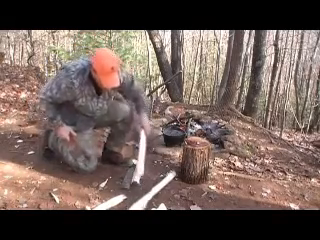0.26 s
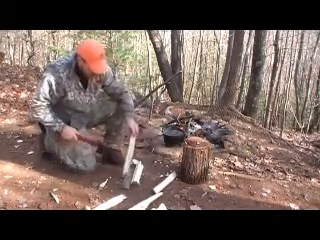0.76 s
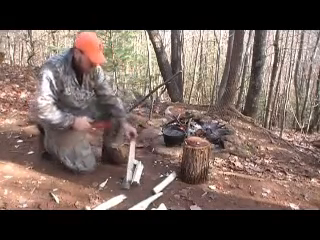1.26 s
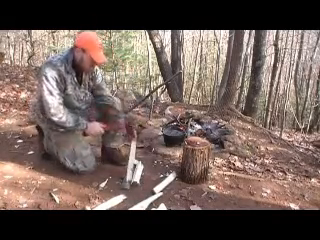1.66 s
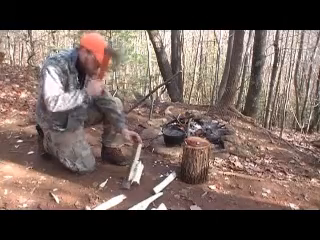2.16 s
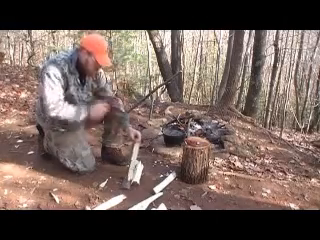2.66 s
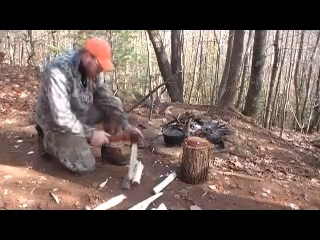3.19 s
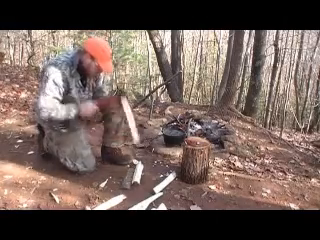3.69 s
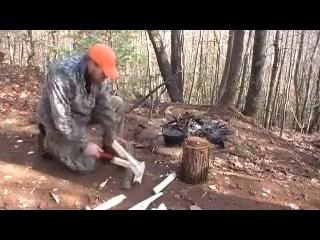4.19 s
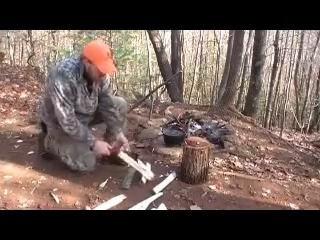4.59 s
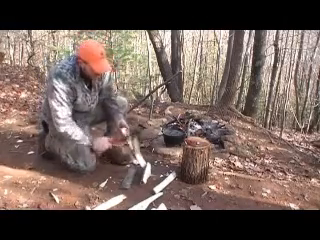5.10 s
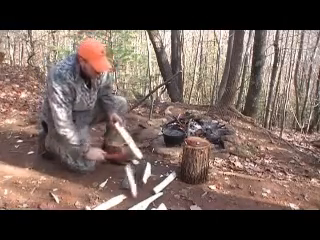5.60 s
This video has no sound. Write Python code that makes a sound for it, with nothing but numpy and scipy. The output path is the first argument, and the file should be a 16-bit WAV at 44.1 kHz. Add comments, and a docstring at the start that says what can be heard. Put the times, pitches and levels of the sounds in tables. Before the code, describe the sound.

In a quiet wood, sticks scrape and knock before three sharp axe blows crack dry wood, the middle one thudding deeper, with splinters ticking afterwards.

```python
"""A camp in a still, leafless wood, where kindling is split with a small axe a little left of the microphones.
A stick is picked off the dirt, stood on a log and tapped; three hard blows tear it open and a piece drops.
Struck wood is a sum of decaying modes; breaking fibres are bursts of tiny uneven snaps.
Wood and sleeves scrape in grains between the blows, and grit keeps the dragged stick ringing.
Dry leaves hiss faintly as filtered noise, and the trees return the work as scattered echoes."""
import sys
import numpy as np
from scipy import signal
from scipy.fft import rfft, irfft
from scipy.io import wavfile
from scipy.ndimage import uniform_filter1d

SR = 44100
rng = np.random.default_rng(int(sys.argv[2]) if len(sys.argv) > 2 else 0)


def unload_wav(signal):
    """Save mono or channel-first audio to the path in sys.argv[1] as 16-bit WAV at rate SR, clipped to [-1, 1]."""
    wavfile.write(
        sys.argv[1],
        SR,
        np.round(np.clip(np.atleast_2d(signal).T, -1, 1) * 32767).astype(np.int16),
    )


N = 257984  # samples in the scene

# Modes of each struck thing, by name. Each row: frequency in Hz, relative level in dB, t60 in seconds,
# all as they are before the pitch, tilt and ring factors of a contact.
WOOD_MODES = { "stick": [(437, -13, 0.0076), (680, -11.5, 0.11), (828, -14.5, 0.082), (930, -17, 0.067),
              (1020, -11, 0.053), (1197, -10.5, 0.089), (1536, -13.5, 0.03), (1665, -1.5, 0.079),
              (2145, -12.5, 0.053), (2555, -17, 0.062), (2806, -10, 0.044), (3220, -28, 0.036),
              (3510, -17, 0.044), (4180, -22, 0.037)], "gripped": [(446, -2.5, 0.018), (536, 0, 0.022),
              (700, -5, 0.033), (870, -7.5, 0.03), (1101, -5.5, 0.028), (1570, -7, .035),
              (2460, -17, 0.011), (2870, -22.5, 0.043)], "axe": [(260, -18, 0.0096), (495, -9, .03),
              (756, -3.5, 0.022), (1010, -5.5, .025), (1390, -5.5, .02), (1820, -1.5, .024),
              (2290, -11.5, 0.022), (2904, -4, 0.03), (4080, -16.5, .02)], "log": [(110, -33.5, 0.036),
              (341, -15.5, .035), (440, -11, .025), (634, 0.5, 0.016), (799, 2, 0.017), (1200, -4.5, .028),
              (1410, -4, 0.029), (2780, -9, 0.015)], "split": [(328, -12.5, .04), (574, -11, 0.056),
              (1090, -7.5, 0.058), (1388, 0, .045), (1700, -14, .025), (2000, -14.5, 0.044),
              (2685, -1, 0.016), (3310, -15.5, 0.05), (4330, -27.5, 0.026)], "splinter": [(1918, -1, .035),
              (2200, -6, 0.019), (2750, -6.5, .03), (3142, -2, 0.029), (3430, -1, 0.053),
              (4670, -5.5, 0.069), (7440, 0.5, 0.038), (7460, 2, 0.023)]}


def ring(modes, pitch=1, length=1, tilt=0):
    """Decaying modes of a struck thing; tilt, in dB per octave about 1 kHz, brightens a harder contact."""
    t = np.arange(SR // 3) / SR
    sound = np.zeros(len(t))
    for k, (hz, db, t60) in enumerate(modes):
        sign = (-1) ** k
        level = amp(db + tilt * np.log2(hz / 1000))
        sound += sign * level * fade(t, t60 * length) * np.sin(2 * np.pi * hz * pitch * t)
    return sound


# Contacts of stick, axe and log. Each row: start in seconds, what rings, level in dB, pitch factor,
# ring time factor, tilt in dB per octave, level in dB of the fibres crushed at the contact.
CONTACTS = [ (.097, "split", -52, .89, 1.3, 6.5, -60), (0.4513, "stick", -16, 0.98, 1.18, -1, -36.5),
            (.619, "gripped", -47, 0.99, 0.65, -7.5, -62), (.652, "log", -51.5, .42, 2.4, -7, -50),
            (.852, "gripped", -49.5, 0.87, 0.98, -5, -58.5),
            (1.1146, "gripped", -24.5, 1.07, 1.12, 0.5, -46), (1.936, "axe", -23, 1, 0.96, 2, -38.5),
            (2.054, "gripped", -52, .98, 2.2, 13, -52), (2.097, "gripped", -42, 1.03, 0.92, -9.5, -58),
            (2.160, "gripped", -51.5, 0.79, 1.16, -6.5, -62),
            (2.224, "stick", -50.5, 0.97, 1.3, 3.5, -58.5), (2.971, "axe", -46, 1, .6, -4, -54),
            (3.3733, "axe", -9, 1.295, 0.28, 0, -28.5), (3.398, "split", -31, 0.99, 0.77, -1.5, -42),
            (3.573, "gripped", -40, 1, 1, -5, -53.5), (4.2283, "log", -4.5, 1.016, 0.86, -.5, -33.5),
            (4.627, "gripped", -45.5, 0.94, 2, -1, -45.5), (4.69, "gripped", -32, 0.75, 1.13, -1, -42),
            (4.691, "splinter", -41, 1.03, .9, -3, -55), (4.710, "split", -41, .88, 1, -2, -56.5),
            (4.948, "splinter", -44, 1.03, .7, 0, -50), (5.680, "split", -18, 1.06, 0.51, 1, -37),
            (5.725, "splinter", -33, .95, 0.7, 0, -46.5), (5.771, "split", -21.5, 1.02, 0.89, 1, -36),
            (5.831, "split", -43, .93, 1.3, 5.5, -44)]
# Struck wood hops and lands again: mean gap in s, first landing in dB, further loss per hop in dB
REBOUND_S, REBOUND_DB, HOP_LOSS_DB = .015, -19, 6


def knocks(hop_count=3):
    """Each contact sets its thing ringing; all but the axe and the log hop and land again, more softly."""
    out = np.zeros(N)
    gap_factors = rng.uniform(.8, 1.2, (len(CONTACTS), hop_count))
    for (s, thing, db, pitch, length, tilt, _), gaps in zip(CONTACTS, gap_factors):
        sound = amp(db) * ring(WOOD_MODES[thing], pitch, length, tilt)
        add(out, s, sound)
        if thing in ("axe", "log"):
            continue
        for k, delay in enumerate(REBOUND_S * np.cumsum(gaps)):
            add(out, s + delay, amp(REBOUND_DB - k * HOP_LOSS_DB) * sound)
    return out


# The wood cracks open three times under each hard blow. Each row: start in seconds,
# bright snap in dB, woody body in dB, time in seconds held before the fade, splinter ring in dB,
# splinter pitch factor.
SPLITS = [ (3.373, -12.5, -10, 0.0016, -14, .58), (3.3775, -17.5, -20, .0022, -21.5, 1.05),
          (3.3861, -14.5, -16, 0.0011, -31, .8), (4.2285, -18, -18.5, 0.0013, -33, .9),
          (4.2323, -15, -24, 0.0011, -27, 1), (4.2913, -17, -37, .0004, -26, 1.05),
          (5.680, -16, -24, .005, -28, 1), (5.6862, -18, -25, .0015, -17, 1),
          (5.692, -15, -18, 0.0014, -16, 1)]
SPLINTER_RING, SPLINTER_TILT = 0.84, -1  # ring time factor, dB per octave


def splinter_rings():
    """Each crack sets the modes of a splinter ringing."""
    out = np.zeros(N)
    for s, *_, db, pitch in SPLITS:
        add(out, s, amp(db) * ring(WOOD_MODES["splinter"], pitch, SPLINTER_RING, SPLINTER_TILT))
    return out


# Fibres heard sharply. Each row: frequency in Hz, relative level in dB.
SNAP_SPECTRUM = [(200, -44.5), (1500, -23.5), (3300, -6), (4200, -8.5), (4900, 0.5), (5700, -2), (7200, 2),
                 (8500, 1), (10500, -9.5), (13000, -17.5)]
# Fibres heard through the wood. Each row: frequency in Hz, relative level in dB.
BODY_SPECTRUM = [(60, -27.5), (350, -10), (700, -8), (1100, -1.5), (1600, -1.5), (2200, 3.5), (2900, 2),
                 (3500, 2.5), (4300, -13.5), (8000, -35)]


def crackle(snap_db, body_db, hold, t60, spread_db=5, first_snap=3):
    """One fibre gives way and a run of tiny uneven snaps follows, heard sharply and through the wood."""
    t = np.arange(SR // 6) / SR
    strength = fade(np.maximum(t - hold, 0), t60)
    sizes = evened(amp(spread_db * np.clip(rng.standard_normal(len(t)), -2, 2.5)))
    sizes = np.where(t == 0, first_snap, sizes)
    snaps = strength * rng.choice([-1, 1], len(t)) * sizes
    out = np.zeros(len(t))
    for db, spectrum in (snap_db, SNAP_SPECTRUM), (body_db, BODY_SPECTRUM):
        sound = colour(snaps, spectrum)
        out += amp(db) * sound * np.linalg.norm(strength) / np.linalg.norm(sound)
    return out


# After each hard blow the split runs on along the grain.
# Each row: start in seconds, time in seconds held before the fade, level in dB.
GRAIN_TEARS = [(3.389, 0.0054, -33), (4.239, .057, -33), (5.7, 0.011, -35)]
# A single fibre or bit of grit snaps.
# Each row: start in seconds, level in dB, time in seconds held before the fade.
SINGLE_SNAPS = [(0.182, -42, .006), (.315, -38, 0.0054), (0.333, -45.5, 0.0045), (.461, -39, .0015),
                (.480, -45, .006), (.654, -40.5, 0.0023), (2.9705, -27, .001), (4.262, -21, .001),
                (4.2705, -24, 0.0017), (4.278, -27.5, 0.0017), (4.9455, -38, .003), (4.961, -42.5, 0.0024),
                (5.138, -38, 0.00054), (5.1435, -33, 0.0028), (5.1722, -37, 0.0016), (5.2058, -38, .0015),
                (5.230, -29, .0016), (5.7712, -26, .0006)]
# Times in s; body levels in dB against the snap
CRUNCH_HOLD_S, CRUNCH_T60, CRUNCH_BODY_DB = 0.0018, 0.063, 2
CRACK_T60 = .013
TEAR_T60, TEAR_BODY_DB = .05, -3.5
TICK_FADE, TICK_BODY_DB = 6, -17  # the fade is the t60 as a multiple of the held time


def cracks():
    """Fibres break: crushed at a contact, cracked open, torn along the grain, or one at a time."""
    out = np.zeros(N)
    for s, *_, db in CONTACTS:
        add(out, s, crackle(db, db + CRUNCH_BODY_DB, CRUNCH_HOLD_S, CRUNCH_T60))
    for s, snap_db, body_db, hold, *_ in SPLITS:
        add(out, s, crackle(snap_db, body_db, hold, CRACK_T60))
    for s, hold, db in GRAIN_TEARS:
        add(out, s, crackle(db, db + TEAR_BODY_DB, hold, TEAR_T60))
    for s, db, hold in SINGLE_SNAPS:
        add(out, s, crackle(db, db + TICK_BODY_DB, hold, TICK_FADE * hold))
    return out


PUSH_SHARE, PUSH_DB = 0.57, 15  # share of the length spent building up; rise over that share in dB


def stroke(t, s, length):
    """Pressure of one stroke: it builds up to the push at s and eases off by as many dB."""
    before = (s - t) / PUSH_SHARE
    after = (t - s) / (1 - PUSH_SHARE)
    return amp(-PUSH_DB * np.maximum(before, after) / length)


# Wood and sleeves scraping. Each row: hardest push in seconds, length in seconds,
# gritty hiss in dB, woody rasp in dB.
SCRAPE_STROKES = [(0.184, 0.18, -47, -49.5), (0.311, .26, -46.5, -56), (.487, .05, -56, -44),
                  (.525, .1, -50.5, -52), (0.774, 0.3, -56, -61), (2.458, 0.26, -63.5, -60.5),
                  (2.656, 0.17, -57, -61.5), (3.917, .14, -60.5, -64), (4.503, 0.089, -48, -50.5),
                  (4.59, 0.25, -52.5, -52), (4.737, 0.15, -55, -56), (4.935, .19, -47, -51),
                  (5.16, .3, -51, -57), (5.28, .04, -47.5, -58.5), (5.363, .03, -51.5, -55.5),
                  (5.845, .14, -43, -42)]
# Gritty hiss. Each row: frequency in Hz, relative level in dB.
HISS_SPECTRUM = [(300, -31.5), (1500, -13), (4000, 0), (6000, 1), (8000, 5.5), (10500, -8), (13000, -15)]
# Woody rasp. Each row: frequency in Hz, relative level in dB.
RASP_SPECTRUM = [(100, -18), (400, -3.5), (850, -7.5), (1400, -1.5), (2000, -2.5), (2650, 1), (3600, 3.5),
                 (4500, -17), (9000, -32.5)]


def scrapes(grains_per_s=2500, spread_db=3.0, catch_db=2.0):
    """Grit and cloth slip in small grains that grow where the wood catches."""
    t, out = np.arange(N) / SR, np.zeros(N)
    sizes = amp(spread_db * np.minimum(rng.exponential(1, N), 4))
    signs = rng.choice([-1, 1], N)
    catching = amp(catch_db * evened(uniform_filter1d(rng.standard_normal(N), size=400)))
    slips = rng.random(N) < grains_per_s / SR
    grains = sizes * signs * catching * slips
    hiss = evened(colour(grains, HISS_SPECTRUM))
    rasp = evened(colour(grains, RASP_SPECTRUM))
    for s, length, hiss_db, rasp_db in SCRAPE_STROKES:
        out += stroke(t, s, length) * (amp(hiss_db) * hiss + amp(rasp_db) * rasp)
    return out


# The stick drags over the dirt. Each row: hardest push in seconds, length in seconds,
# level in dB, tilt in dB per octave.
DIRT_DRAGS = [(.11, .26, -60, 14), (.32, .2, -52, 4)]


def drag(pitch=.95, ring_factor=1.5):
    """Grit under the sliding stick keeps its modes faintly ringing."""
    t, out = np.arange(N) / SR, np.zeros(N)
    for s, length, db, tilt in DIRT_DRAGS:
        modes = ring(WOOD_MODES["stick"], pitch, ring_factor, tilt)
        singing = signal.fftconvolve(rng.standard_normal(N), modes)[:N]
        out += amp(db) * stroke(t, s, length) * evened(singing)
    return out


# Left microphone over right. Each row: frequency in Hz, level difference in dB.
LEFT_OVER_RIGHT = [(200, 1), (800, 3), (1700, 2.3), (3000, 1.6), (4000, 0), (12000, 0)]
# Phase of left against right, from reflections close by. Each row: frequency in Hz, phase in radians.
LEFT_RIGHT_PHASE = [(0, 0), (430, -0.2), (690, 0.2), (1120, -0.1), (1810, 0.1), (2500, -0.3), (3880, -0.0),
                    (13600, 0.0)]


def nearby_sound(work):
    """The work with its nearest reflections; half of each level and phase difference goes to either side."""
    hz = np.fft.rfftfreq(N, 1 / SR)
    left = amp(read(LEFT_OVER_RIGHT, hz) / 2) * np.exp(1j * read(LEFT_RIGHT_PHASE, hz) / 2)
    return irfft(rfft(work) * np.array([left, 1 / left]), N)


# Fade of the long echo off the trunks. Each row: frequency in Hz, t60 in seconds.
TRUNK_T60 = [(200, .6), (700, 1), (1400, 1.1), (3000, 0.75), (7000, 0.61), (12000, .5)]
# Strength of the long echo before its build-up. Each row: frequency in Hz, level in dB.
TRUNK_DB = [(200, -31), (450, -29), (750, -22.5), (1000, -24.5), (1320, -14.5), (1650, -24.5), (2800, -19),
            (4500, -19), (7000, -20.5), (12000, -22)]


def forest(x, build_s=0.034, near_db=-21, near_t60=0.087):
    """The ground and things close by scatter a short echo; the trunks add a long, faint one."""
    t = np.arange(SR) / SR
    sparse = rng.standard_normal((2, SR)) * (rng.random((2, SR)) < .15)
    taps = pair(*sparse)
    hz, s, bands = signal.stft(taps, SR, nperseg=256)
    t60 = read(TRUNK_T60, hz)[:, None]
    bands = bands * np.exp(-np.log(1000) * s / t60)
    # a slower fade starts lower, so that the level sets the energy
    bands *= amp(read(TRUNK_DB, hz))[:, None] * np.sqrt(np.log(10 ** 6) / t60)
    far = signal.istft(bands, SR, nperseg=256)[1][:, :SR] / np.linalg.norm(taps[0])
    far = far * (1 - np.exp(-t / build_s))
    near = taps * fade(t, near_t60) * (t > .003)
    near *= amp(near_db) / np.linalg.norm(near[0])
    return signal.fftconvolve(x[None], far + near, axes=1)[:, :N]


# Likeness of left and right in air and echoes. Each row: frequency in Hz, likeness from 0 to 1.
LIKENESS = [(50, .6), (250, 0.27), (1000, 0.14), (2500, 0.28), (4000, 1), (12000, 1)]


def pair(a, b):
    """Two unrelated signals become left and right, sharing as much of each frequency as its likeness."""
    same = np.clip(read(LIKENESS, np.fft.rfftfreq(len(a), 1 / SR)), 0, 1)
    mid = rfft(a) * np.sqrt((1 + same) / 2)
    side = rfft(b) * np.sqrt((1 - same) / 2)
    return irfft(np.array([mid + side, mid - side]), len(a))


# Hiss of the wood. Each row: frequency in Hz, relative level in dB.
AIR_SPECTRUM = [(18, -71), (30, -48.5), (77, -4.5), (154, -1), (315, -1), (791, -2), (854, -2.5),
                (1050, -3), (1580, -3.5), (1930, -4), (2910, -4.5), (3670, -8.5), (7690, -3.5),
                (12200, -13.5), (13500, -28)]


def air(level_db=-58, swell_db=-0.46):
    """The faint, even hiss of the wood: filtered noise with a slight slow swell."""
    a, b, slow = rng.standard_normal((3, N))
    swell = amp(swell_db * evened(uniform_filter1d(slow, size=12000)))
    hiss = evened(pair(colour(a, AIR_SPECTRUM), colour(b, AIR_SPECTRUM)))
    return amp(level_db) * swell * hiss


def amp(db):
    """Decibels to gain."""
    return 10 ** (np.asarray(db) / 20)


def evened(x):
    """Scales to rms 1."""
    return x / np.sqrt(np.mean(x ** 2) + 1e-20)


def read(points, hz):
    """Reads a table on a log-frequency axis."""
    f, value = np.transpose(points)
    return np.interp(np.log(hz + 1), np.log(f + 1), value)


def fade(t, t60):
    """Exponential decay, 60 dB in t60."""
    return np.exp(-np.log(1000) * t / max(t60, 1e-4))


def add(mix, s, sound):
    """Adds a sound to the mix at time s."""
    part = mix[round(s * SR):][:len(sound)]
    part += sound[:len(part)]


def colour(x, points, size=2048):
    """Causal minimum-phase filter with the given spectrum."""
    log_gain = np.log(amp(read(points, abs(np.fft.fftfreq(size, 1 / SR)))))
    taps = np.fft.ifft(np.exp(np.conj(signal.hilbert(log_gain)))).real
    return signal.fftconvolve(x, taps[:size // 2])[:len(x)]


def scene(directions=5):
    """The work a little to the left, its echoes with fresh cracks for each direction, and the air."""
    handling = knocks() + splinter_rings() + scrapes() + drag()
    nearby = nearby_sound(handling + cracks())
    # a crack sounds different in each direction that the trees return
    echoes = sum(forest(handling + cracks()) for _ in range(directions)) / np.sqrt(directions)
    return nearby + echoes + air()


def record(dry, ceiling=.85, edge_hz=13500):
    """The microphones' signal clips on the hardest peaks, then loses the treble above the band edge."""
    clipped = np.clip(dry, -ceiling, ceiling)
    lowpass = signal.firwin(221, edge_hz, window=("kaiser", 8), fs=SR)
    return signal.oaconvolve(clipped, lowpass[None], "same")


dry = scene()
out = record(dry)
unload_wav(out)
```